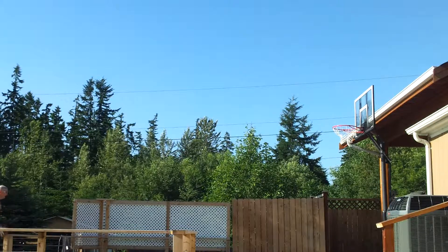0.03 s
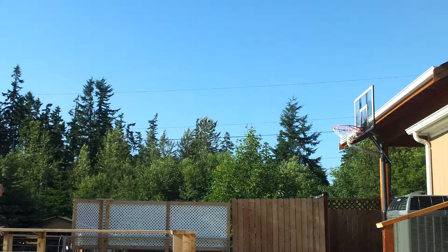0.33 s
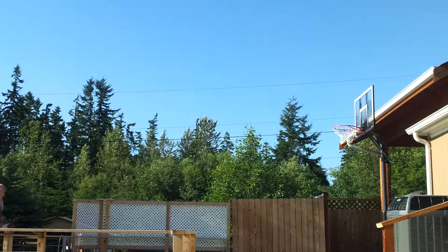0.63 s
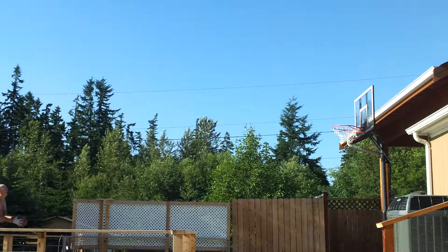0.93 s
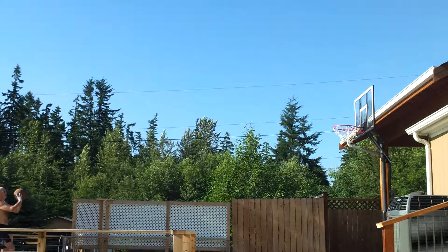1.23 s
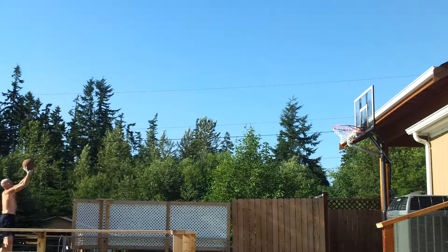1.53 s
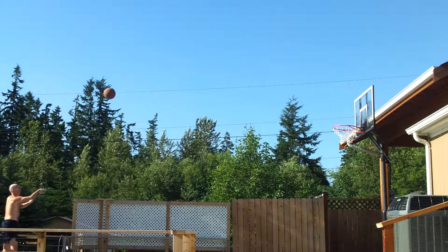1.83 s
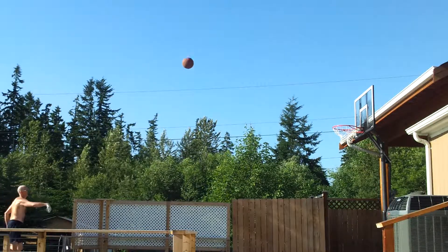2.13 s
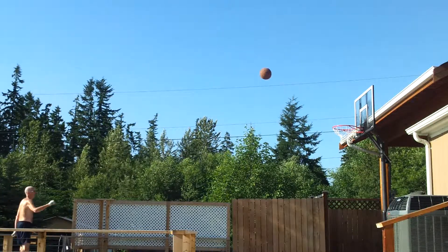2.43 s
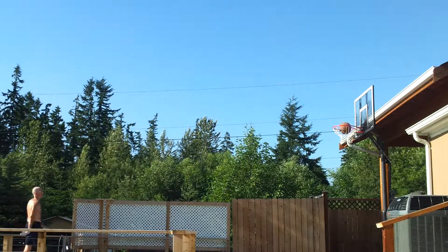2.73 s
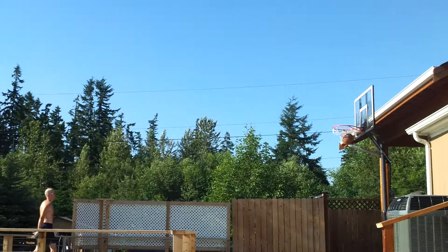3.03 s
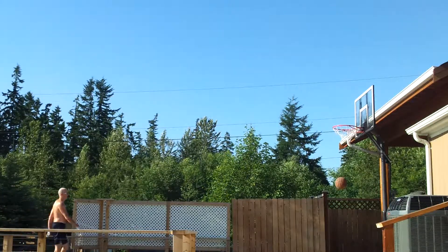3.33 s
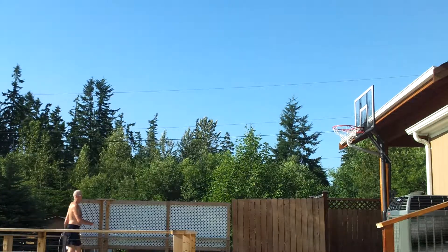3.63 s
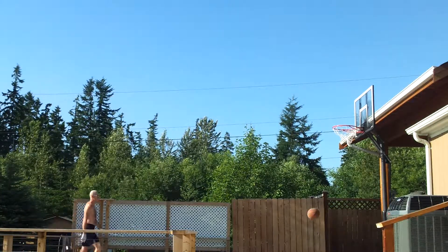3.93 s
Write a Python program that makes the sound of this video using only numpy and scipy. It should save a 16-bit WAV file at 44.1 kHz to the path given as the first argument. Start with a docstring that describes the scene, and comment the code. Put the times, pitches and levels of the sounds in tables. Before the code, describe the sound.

A basketball shot falls through a hoop in a quiet backyard. After faint hand rustles over far traffic and leaves, the net swishes and the rim shakes, then the ball thumps the ground with a short echo.

```python
"""A basketball drops through a hoop in a quiet backyard. Distant traffic and leaf hiss run throughout; a deep
rumble slowly builds, a low hum swells twice and faint rustles and high wisps come and go around the yard. At
2.85 s the ball drags through the net, whose cords snap taut and shake the rim. At 3.76 s it lands on hard
ground with a slap, a thump and a ring of the air inside, echoed by the house and fence."""
import sys
import numpy as np
from scipy import signal
from scipy.fft import rfft, irfft
from scipy.io import wavfile

SR = 44100
rng = np.random.default_rng(int(sys.argv[2]) if len(sys.argv) > 2 else 0)


def master_out(mix):
    """Clip the mix to full scale and print it as 16-bit PCM to the path in sys.argv[1]."""
    frames = np.transpose(np.atleast_2d(mix))
    ceiling = np.clip(frames, -1, 1)
    pcm = np.round(ceiling * 32767).astype(np.int16)
    wavfile.write(sys.argv[1], SR, pcm)


N = 176400
TIME = np.arange(N) / SR
LAND_S = 3.7617


def from_db(db):
    """Decibels to gain."""
    return 10 ** (np.asarray(db) / 20)


def rms_one(x):
    """Scale to an rms of one."""
    return x / np.sqrt(np.mean(x ** 2) + 1e-20)


def colour(x, points):
    """Minimum-phase EQ through (f/Hz, relative level/dB) points; keeps the power of white noise."""
    hz, db = np.transpose(points)
    bins = np.linspace(1, SR / 2, N + 1)
    roll_off_db = 60 * (2 * bins / SR) ** 8
    gain = rms_one(from_db(np.interp(np.log(bins), np.log(hz), db) - roll_off_db))
    cepstrum = irfft(np.log(gain))
    cepstrum[1:N] *= 2
    cepstrum[N + 1:] = 0
    return irfft(rfft(x, 2 * N) * np.exp(rfft(cepstrum)))[:N]


def cut(x, hz, kind):
    """Second-order low- or high-pass."""
    return signal.sosfilt(signal.butter(2, hz, kind, fs=SR, output="sos"), x + 1e-18)


def burst(start, rise, t60):
    """Envelope: a straight attack, then an exponential decay."""
    age = TIME - start
    return np.clip(age / rise, 0, 1) * from_db(-60 * np.maximum(age - rise, 0) / t60)


def fader(points, outside_db=None):
    """Gain ridden through (t/s, level/dB) points."""
    return from_db(np.interp(TIME, *np.transpose(points), left=outside_db, right=outside_db))


def delay(x, s):
    """The same sound, s seconds later."""
    return np.concatenate([np.zeros(int(s * SR)), x])[:N]


def click(s):
    """A unit impulse at time s."""
    return delay(signal.unit_impulse(N), s)


def ring(x, hz, t60):
    """One mode: a unit click sets a sine of height one ringing."""
    radius, angle = from_db(-60 / (t60 * SR)), 2 * np.pi * hz / SR
    return signal.lfilter([0, np.sin(angle)], [1, -2 * radius * np.cos(angle), radius ** 2], x + 1e-18)


def traffic_and_leaves():
    """A bed of far traffic and leaf hiss whose lows and mids swell briefly."""
    # EQ of the bed: f/Hz, level/dB
    bed_eq = [(12, -27), (20, -23), (40, -10.5), (80, -6.5), (160, -4), (283, -6.5), (390, -6.5), (568, -5),
              (720, -3), (860, -.5), (1140, -3), (1400, -8.5), (1750, -16.5), (2280, -22.5), (3000, -24),
              (5000, -25.5), (7000, -25), (9000, -27), (12000, -28.5)]
    # swell of the far rush: t/s, level/dB
    swell = [(.5, 0), (.56, 3.5), (.63, 0), (1.6, .3), (2.2, -.7), (2.8, -.3)]
    bed = from_db(-45) * colour(rng.standard_normal(N), bed_eq)
    far_rush = signal.sosfiltfilt(signal.butter(2, 1700, fs=SR, output="sos"), bed)
    return bed + (fader(swell) - 1) * far_rush


def rumble():
    """Deep noise that slowly builds under the bed."""
    # the build: t/s, level/dB
    build = [(0, -63.5), (1.2, -60), (2.2, -57.5), (2.7, -55.5), (4, -57)]
    # bass-heavy EQ: f/Hz, level/dB
    rumble_eq = [(12, -22), (25, -7), (38, -2), (55, -3), (120, -8), (200, -24.5), (600, -73)]
    return fader(build) * colour(rng.standard_normal(N), rumble_eq)


def hum(hz=73):
    """A low tone that swells twice."""
    # swells: t/s, level/dB
    swells = [(.85, -52), (1.72, -49.5)]
    envelope = sum(from_db(db) * burst(s, rise=0.11, t60=0.86) for s, db in swells)
    return envelope * np.sin(2 * np.pi * hz * TIME)


def rustles():
    """Short, soft, high rubs and wisps here and there around the yard."""
    # rubs, wisps and ticks: t/s, level/dB, attack/s, t60/s, centre/Hz, half-width/octaves
    rubs = [(.13, -54, 0.033, 0.27, 4470, .9), (.59, -60, 0.037, 0.72, 6700, 0.073),
            (1.36, -52.5, 0.028, 0.24, 5500, 0.46), (1.48, -57, 0.046, 0.26, 5100, .14),
            (1.66, -53, 0.019, 0.27, 4400, .8), (1.74, -54, 0.014, .12, 7160, .15),
            (1.886, -48.5, 0.001, 0.019, 4600, 0.36), (3.19, -54.5, 0.028, .25, 5300, 0.12)]
    out = np.zeros(N)
    for s, db, rise, t60, hz, octaves in rubs:
        edges = [hz / 2 ** octaves, hz * 2 ** octaves]
        rub = signal.sosfilt(signal.butter(1, edges, "band", fs=SR, output="sos"), rng.standard_normal(N))
        out += from_db(db) * burst(s, rise, t60) * rms_one(rub)
    return out


def yard_reverb(x):
    """A short diffuse tail scattered by fence, deck and trees."""
    # EQ of the tail: f/Hz, level/dB
    tail_eq = [(60, -12), (250, 7), (500, 3.5), (900, -5.5), (1600, -3.5), (3000, -0.5), (5000, -1.5),
               (7500, 2), (10000, 4.5), (12000, -1)]
    tail = colour(rng.standard_normal(N), tail_eq) * burst(0, rise=0.014, t60=0.47)
    return from_db(-8.5) * signal.fftconvolve(x, tail / np.sqrt(np.sum(tail ** 2)))[:N]


def wall_echoes(x):
    """Early reflections off house wall and fence, thin in the bass."""
    # reflections: delay/s, level/dB, low-pass/Hz
    taps = [(0.0193, -5, 15000), (.0328, -12, 1700), (0.0364, -18.5, 12000)]
    thin = cut(x, 450, "high")
    return sum(from_db(db) * delay(cut(thin, top_hz, "low"), s) for s, db, top_hz in taps)


def fibres(slips_per_s=6000, spread_db=2):
    """Cord texture: dense tiny slips of uneven size, at an rms of one."""
    sizes = from_db(spread_db * np.minimum(rng.exponential(1, N), 4))
    signs = rng.choice([-1, 1], N)
    return rms_one(sizes * signs * (rng.random(N) < slips_per_s / SR))


def cord_friction():
    """The ball slides along the cords of the net."""
    # envelope of the drag: t/s, level/dB
    drag = [(2.85, -80), (2.862, -59), (2.888, -50), (2.91, -62), (2.935, -50), (2.95, -41.5), (3.01, -42),
            (3.08, -43), (3.12, -52.5), (3.15, -73), (3.25, -63), (3.42, -62)]
    # EQ of the rubbing: f/Hz, level/dB
    drag_eq = [(150, -7), (450, -1), (1000, 0), (2200, 0.5), (3500, -8), (3750, -3), (4100, -4), (4600, -9),
               (6000, 0), (6900, 2.5), (8000, -16), (10000, -10.5), (12000, -27)]
    return fader(drag, outside_db=-200) * colour(fibres(), drag_eq)


def rim(pull):
    """The rim rings as the cords pull on it."""
    # rim modes: f/Hz, relative level/dB, t60/s
    modes = [(238.5, -32, 1.1), (294.2, -30, 0.72), (463, -32, .3), (498, -33, 0.4), (1083, -19, 0.22),
             (1305, -15.5, .28), (1410, -22, 0.081), (1485, -21, .13), (2150, -17, .05), (3770, -14, .04)]
    return sum(from_db(db) * ring(pull, hz, t60) for hz, db, t60 in modes)


def cord_snaps(t60=0.063, crossover_hz=2500):
    """Cords snap taut round the ball one after another, and each tug shakes the rim."""
    # tugs: t/s, level/dB, treble gain/dB, low-pass/Hz, pull on the rim/dB
    tugs = [(2.8563, -38.5, 2.5, 11300, -41), (2.8713, -31.5, -6.5, 11000, -34),
            (2.883, -34.5, -4.5, 11000, -43), (2.9232, -32.5, 3, 5000, -42), (2.9405, -43, 8.5, 10000, -34),
            (2.962, -34, -9, 6000, -43), (2.979, -43.5, 11, 10000, -44), (3.012, -35.5, 2, 9000, -40),
            (3.05, -33.5, 3.5, 5900, -29), (3.0959, -32, 1.5, 4950, -36), (3.111, -43, -2, 9000, -48),
            (3.1313, -35.5, 2.5, 4930, -33), (3.180, -30, -20, 1700, -31), (3.21, -40, -8, 2200, -35),
            (3.256, -37, -14, 1600, -41.5)]
    # EQ of a snap: f/Hz, level/dB
    snap_eq = [(100, -25), (300, -2.5), (700, -0.5), (1350, -0.5), (1800, -2), (2200, -6), (3300, -7.5),
               (3800, -7.5), (4700, -10), (6800, -1), (9000, -7.5), (12000, -17)]
    snap, jerk = colour(fibres(), snap_eq), fibres()
    body, treble = cut(snap, crossover_hz, "low"), cut(snap, crossover_hz, "high")
    snaps, pull = np.zeros((2, N))
    for s, db, treble_db, top_hz, pull_db in tugs:
        envelope = burst(s, rise=0.00077, t60=t60)
        snaps += from_db(db) * envelope * cut(body - from_db(treble_db) * treble, top_hz, "low")
        pull += from_db(pull_db) * envelope * cut(jerk, top_hz, "low")
    build_up = np.sqrt(t60 * SR / 20)  # roughly how much a mode gathers over one tug
    return snaps + rim(pull) / build_up


def ball_thump(hz=99, rise_s=0.0027, hold_s=0.0064, t60=0.028):
    """The squashed ball shrinks and swells for a low cycle or two, then settles fast."""
    age = TIME - LAND_S - 0.0013  # just behind the slap
    attack = np.clip(age / rise_s, 0, 1)
    decay = from_db(-60 * np.maximum(age - rise_s - hold_s, 0) / t60)
    return -from_db(-16.5) * attack * decay * np.sin(2 * np.pi * hz * age)


def ball_landing(knock_top_hz=1270):
    """The shell slaps the gritty ground, flexes, and sets the air inside ringing."""
    # EQ of the bright slap: f/Hz, level/dB
    slap_eq = [(60, -10), (400, -6), (1000, -2), (2000, 2.5), (3300, -3), (4500, 5.5), (5500, 8),
               (6200, -2), (7000, 3.5), (8200, -8), (9000, -24), (12000, -21)]
    # EQ of the grit: f/Hz, level/dB
    grit_eq = [(100, -16), (320, -1), (500, -12), (900, 12.5), (1700, 0), (2600, 1.5), (3500, -4),
               (5000, -8), (7000, -1.5), (9000, -11.5), (12000, -25)]
    # dull knocks as the shell flattens and springs back: t/s after landing, relative level/dB
    flexes = [(.004, -13), (.005, -11.5), (.013, -4), (.014, -18)]
    # modes of the air inside the ball: f/Hz, level/dB, t60/s
    air_modes = [(696, -28, 0.14), (892, -30.5, 0.087), (955, -38, 0.13), (990, -34, 0.094),
                 (1086.6, -27, 0.093), (1480, -32, 0.13), (1547, -41, 0.15), (1695, -48, 0.06),
                 (2130, -46, 0.13), (2380, -48, .15), (2598, -54, .15), (2790, -36, 0.083),
                 (4570, -48, 0.13), (4930, -47, .14)]
    hit = click(LAND_S)
    slap = from_db(3.5) * colour(hit, slap_eq)
    grit = from_db(-17) * burst(LAND_S, rise=1 / SR, t60=0.034) * colour(rng.standard_normal(N), grit_eq)
    flex = sum(from_db(db) * click(LAND_S + s) for s, db in flexes)
    knocks = -cut(flex, knock_top_hz, "low") * np.sqrt(SR / (2 * knock_top_hz))  # with make-up gain
    cavity = sum((-1) ** k * from_db(db) * ring(hit, hz, t60) for k, (hz, db, t60) in enumerate(air_modes))
    return slap + grit + knocks + cavity


def scene():
    """Mono mix of rustles, swish and landing over the ambience of the yard."""
    swish = cord_snaps() + cord_friction()
    landing, thump = ball_landing(), ball_thump()
    space = wall_echoes(landing) + yard_reverb(swish + landing + from_db(-9.5) * thump)
    action = rustles() + swish + landing + thump
    ambience = traffic_and_leaves() + rumble() + hum()
    return (ambience + action + space)[None]


def record(dry):
    """A steep low-pass takes off the very top."""
    return signal.sosfilt(signal.ellip(12, .1, 80, 11850, fs=SR, output="sos"), dry)


dry = scene()
out = record(dry)
master_out(out)
```